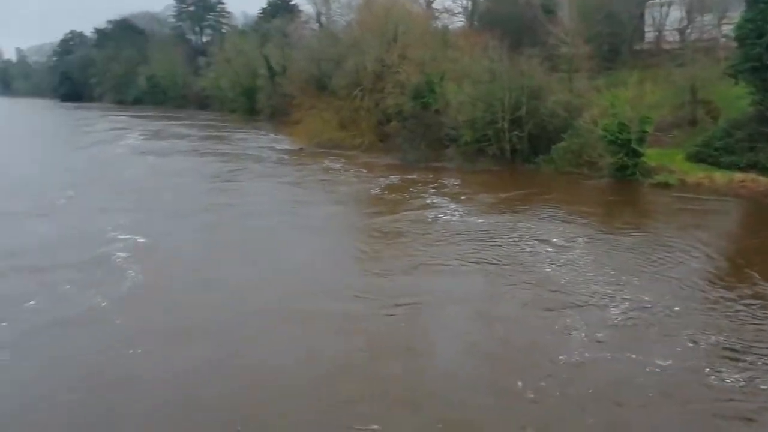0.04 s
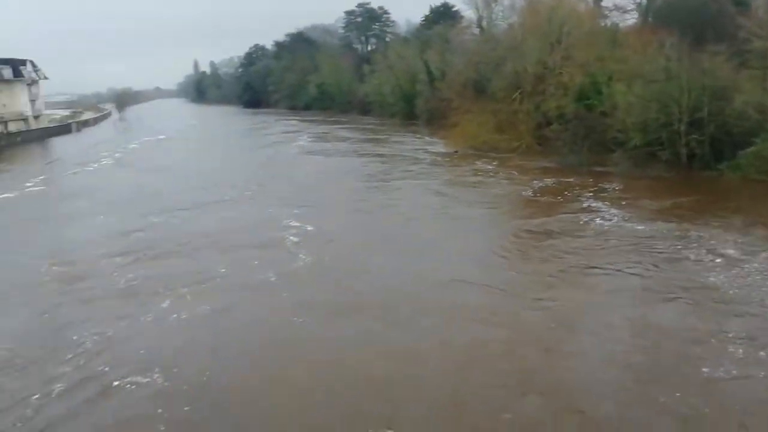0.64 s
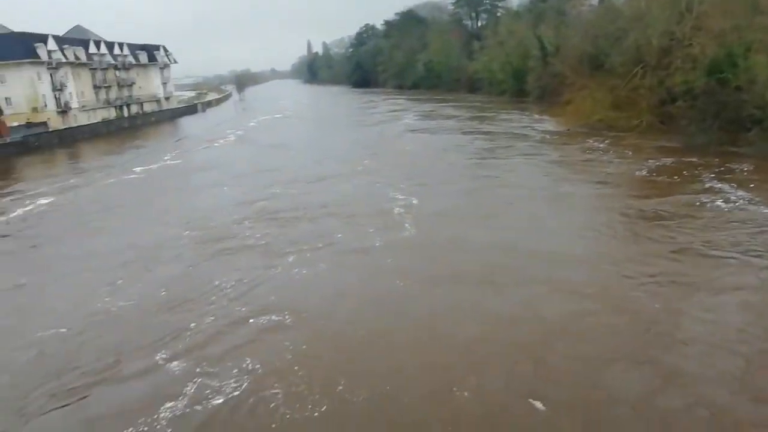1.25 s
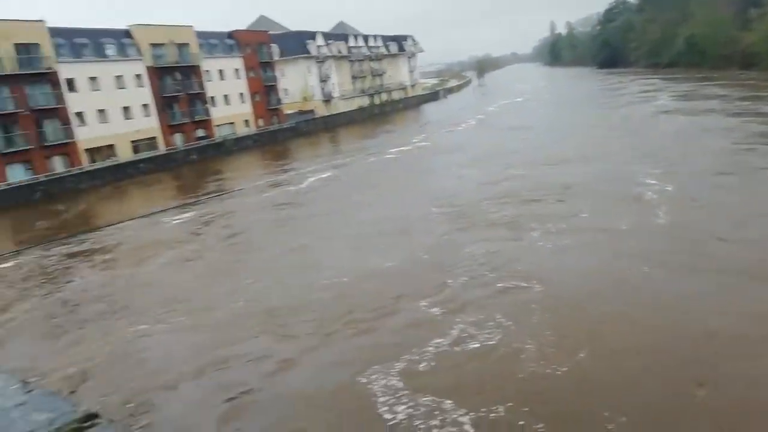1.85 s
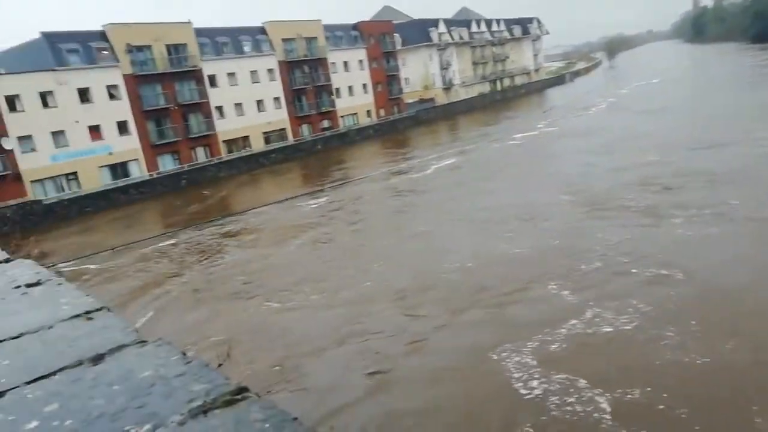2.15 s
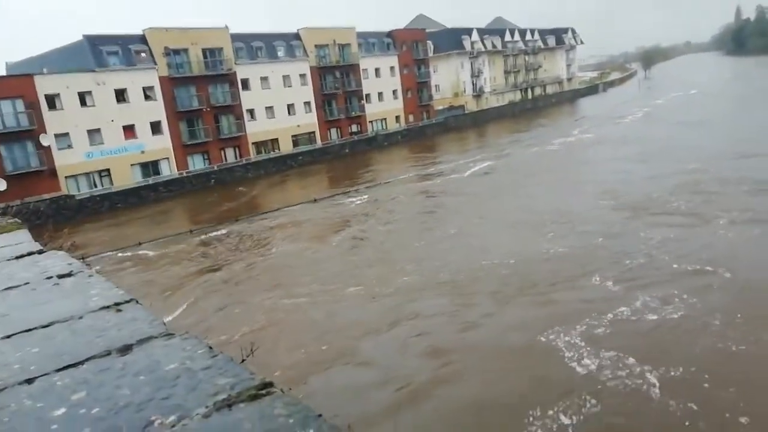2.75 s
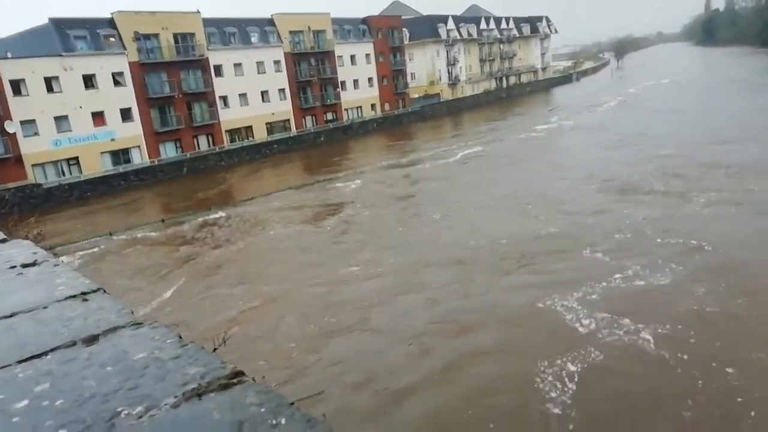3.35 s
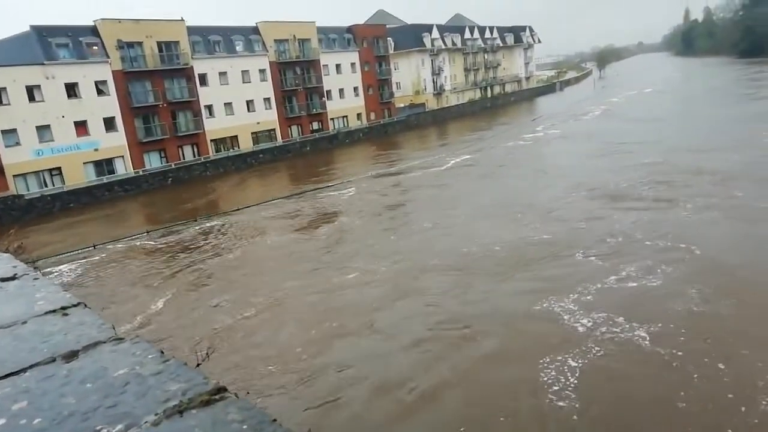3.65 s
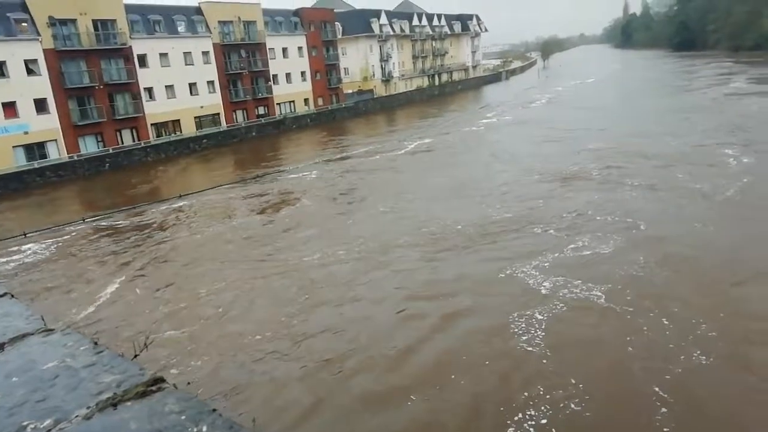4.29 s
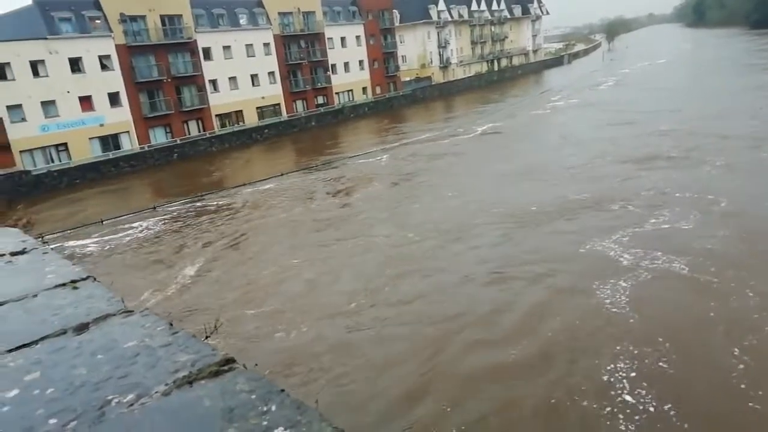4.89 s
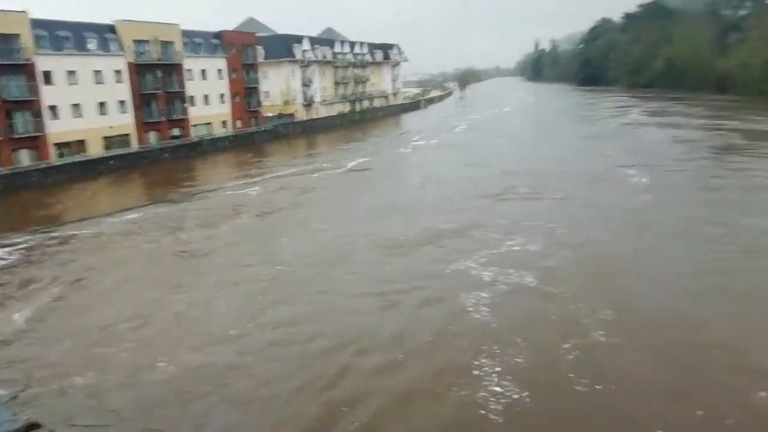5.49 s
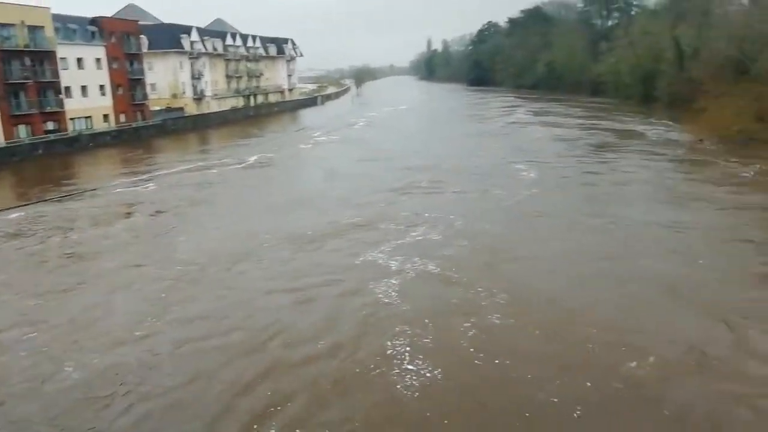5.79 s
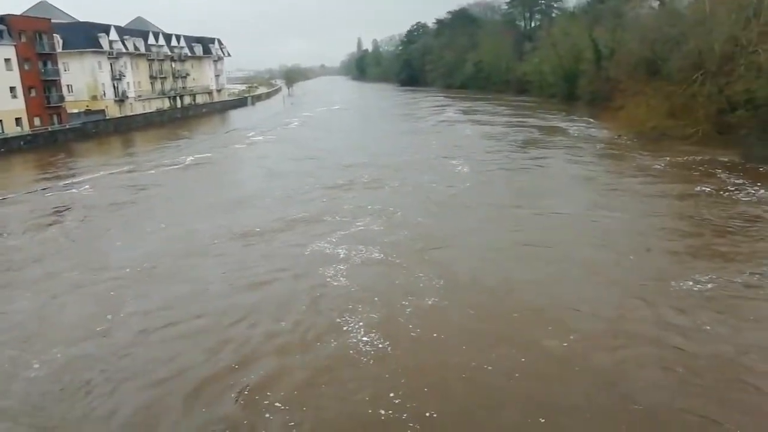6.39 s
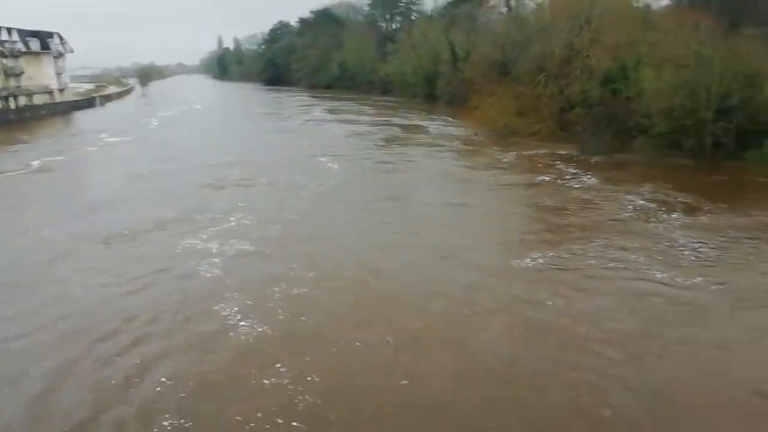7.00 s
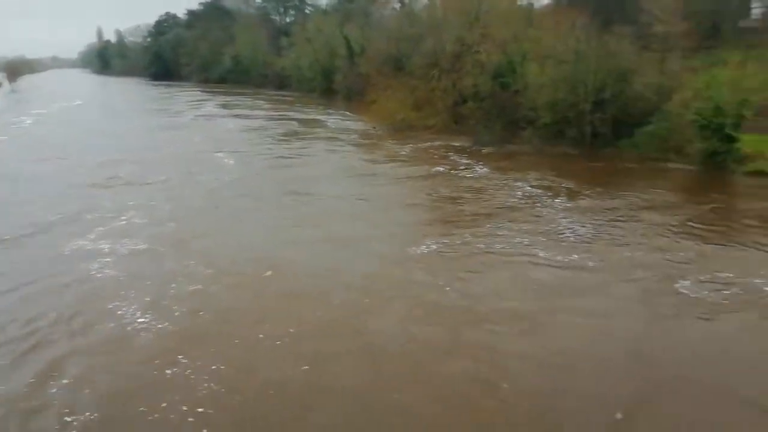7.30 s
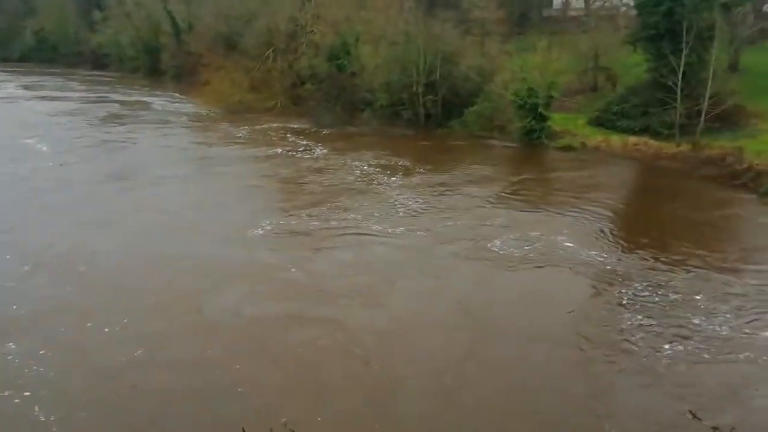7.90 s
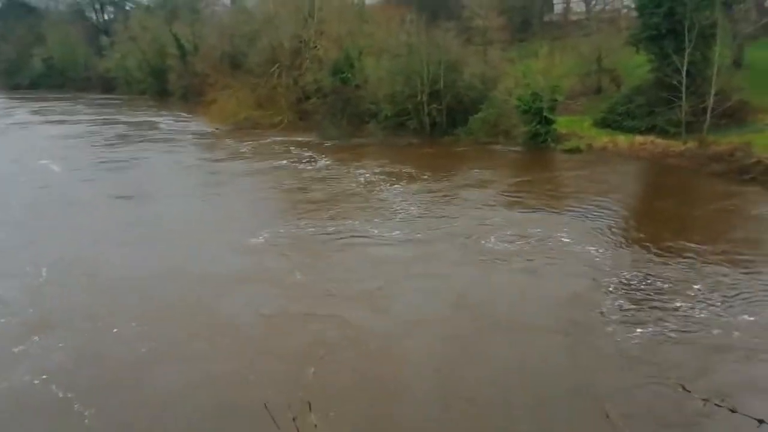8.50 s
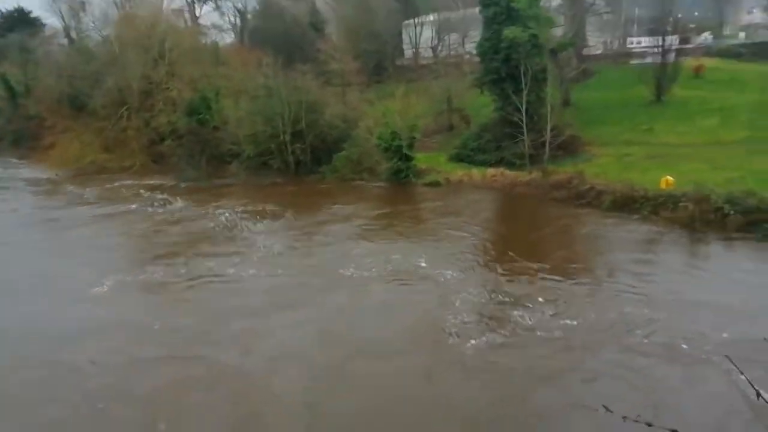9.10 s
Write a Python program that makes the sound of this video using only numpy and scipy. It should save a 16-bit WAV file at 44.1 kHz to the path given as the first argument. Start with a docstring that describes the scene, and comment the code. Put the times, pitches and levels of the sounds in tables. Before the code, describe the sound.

A flooded river rushes steadily as wind buffets the microphone and a car swishes past on a wet road, left to right.

```python
"""A river in flood rushes and churns under a town bridge, bubbles ringing in the water.
Gusts and hard eddies buffet the two ports of a hand-held microphone.
A car passes close behind on the wet roadway, left to right: the exhaust drones, the tyres roar,
air howls in the tread grooves, and in each puddle water swishes out of the treads with a fine
spray of droplets. A few larger drops are flung from the wheels."""
import sys
import numpy as np
from scipy import signal
from scipy.fft import rfft, irfft, next_fast_len
from scipy.io import wavfile
from scipy.ndimage import uniform_filter1d

SR = 44100
rng = np.random.default_rng(int(sys.argv[2]) if len(sys.argv) > 2 else 0)


def master_out(mix):
    """Clip the mix to full scale and print it as 16-bit PCM to the path in sys.argv[1]."""
    frames = np.transpose(np.atleast_2d(mix))
    ceiling = np.clip(frames, -1, 1)
    pcm = np.round(ceiling * 32767).astype(np.int16)
    wavfile.write(sys.argv[1], SR, pcm)


N = 407925
TIME = np.arange(N) / SR
BINS_HZ = np.fft.rfftfreq(next_fast_len(N), 1 / SR)
SIDES = np.array([[1], [-1]])   # left, right


def from_db(db):
    return 10 ** (np.asarray(db) / 20)


def unit_rms(x):
    return x / np.sqrt(np.mean(x ** 2) + 1e-20)


def pan(left_right_db):
    return from_db(SIDES * left_right_db / 2)


def in_time(rows):
    """Table columns, interpolated linearly in time."""
    times_s, *columns = np.transpose(rows)
    return [np.interp(TIME, times_s, column) for column in columns]


def swell(from_s, hold_s, rise_s, fall_s):
    """Exponential rise to 1 at from_s, hold, exponential fall."""
    outside = np.maximum(from_s - TIME, 0) / rise_s + np.maximum(TIME - from_s - hold_s, 0) / fall_s
    return np.exp(-np.minimum(outside, 20))


def drift(rate_hz):
    """Slow random wander, rms 1."""
    pole = np.exp(-80 * np.pi * rate_hz / SR)
    slow = signal.lfilter([1], [1, -2 * pole, pole * pole], rng.standard_normal(N // 40 + 2002))[2000:]
    return np.interp(np.arange(N) / 40, np.arange(len(slow)), unit_rms(slow))


def flutter(rate_hz):
    """Drift less its 0.1 s running mean, rms 1."""
    quick = drift(rate_hz)
    return unit_rms(quick - uniform_filter1d(quick, size=4400))


def grains(per_s, spread_db):
    """Random clicks of uneven size."""
    sizes = from_db(spread_db * np.minimum(rng.exponential(1, N), 4)) * rng.choice([-1, 1], N)
    return sizes * (rng.random(N) < per_s / SR)


def ring(clicks, hz, cycles):
    """Each click rings a sine that falls 60 dB in the given cycles."""
    radius, angle = from_db(-60 * hz / (cycles * SR)), 2 * np.pi * hz / SR
    return signal.lfilter([0, np.sin(angle)], [1, -2 * radius * np.cos(angle), radius ** 2], clicks + 1e-18)


def lowpass(x, order, edge_hz):
    return signal.sosfilt(signal.butter(order, edge_hz, fs=SR, output="sos"), x)


def split(x, edge_hz):
    """Zero-phase low and high bands."""
    low = signal.sosfiltfilt(signal.butter(3, edge_hz, fs=SR, output="sos"), x)
    return low, x - low


def noise_band(centre_hz, width_hz):
    """Narrow noise about a fixed or moving centre, rms 1."""
    slow = lowpass(rng.standard_normal((2, N)), 3, width_hz / 2)
    phase = 2 * np.pi * np.cumsum(centre_hz * np.ones(N)) / SR
    return unit_rms(slow[0] * np.cos(phase) + slow[1] * np.sin(phase))


def fft_filter(x, gain):
    return irfft(rfft(x, next_fast_len(N)) * gain, next_fast_len(N))[..., :N]


def colour(x, spectrum, power=1):
    """Filter by (frequency [Hz], gain [dB]) rows, raised to a power."""
    hz, db = np.transpose(spectrum)
    return fft_filter(x, from_db(power * np.interp(np.log(BINS_HZ + 1), np.log(hz), db)))


def phase_lead(table):
    """Opposite phase shifts for the ports from (frequency [Hz], ..., left lead [rad]) rows."""
    hz, *_, lead_rad = np.transpose(table)
    return np.exp(.5j * SIDES * np.interp(BINS_HZ, hz, lead_rad))


def lagged(x, lead_ms):
    """One wave at both ports, the left earlier by lead_ms."""
    fine, fine_s = signal.resample_poly(x, 2, 1), np.arange(2 * N) / (2 * SR)
    return np.array([np.interp(TIME + side * lead_ms / 2000, fine_s, fine) for side in (1, -1)])


# Rush of the water: (time [s], level [dB])
RIVER_LEVEL = [(0.0, -35), (0.8, -36), (1.5, -35), (2.3, -37), (4.5, -35.5), (7.3, -35.5), (8.1, -37),
               (8.7, -37), (9.25, -37)]
# Its spectrum: (frequency [Hz], gain [dB])
RIVER_SPECTRUM = [(40, 5.5), (60, 3.5), (200, -6), (450, -11), (850, -9.5), (1250, -12.5), (1800, -14),
                  (2450, -15.5), (3100, -16.5), (4000, -17.5), (5200, -17.5), (6800, -23.5), (8200, -25.5),
                  (10500, -40.5), (15500, -54)]
# Its spread over the ports: (frequency [Hz], coherence [0-1], left lead [rad])
RIVER_SPREAD = [(100, 0.99, 0.5), (244, 0.89, -1), (444, 0.82, 2.5), (610, 0.74, 3), (1010, 0.65, 3.5),
                (1300, 1, 4.5), (1470, 0.28, 5), (1900, 0.34, 6), (2500, 0.6, 4.5), (3260, 0.54, 7),
                (4080, 0.38, 9), (5270, 0.12, 13.5), (6370, 0.24, 15), (8300, 0.23, 12.5),
                (11000, 0.3, 17.5)]
# Its treble balance as the microphone turns: (time [s], left-right [dB])
RIVER_TREBLE_PAN = [(0.0, 0.5), (1.5, 1.5), (7.5, -1.5), (9.25, 1)]


def river(bubble_db=-9, surge_db=0.4):
    """A broad rush with nearer bubbles ringing in it; so wide a source is only partly coherent."""
    bursts, size_class = grains(per_s=1800, spread_db=8.5), rng.integers(0, 20, N)
    bubbles = sum(ring(bursts * (size_class == k), hz, cycles=15) * hz
                  for k, hz in enumerate(np.geomspace(600, 8000, 20)))
    rush = rng.standard_normal((3, N))
    rush[0] += from_db(bubble_db) * unit_rms(bubbles)
    water = unit_rms(colour(rush, [(5, -16)] + list(RIVER_SPECTRUM)))
    water *= from_db(in_time(RIVER_LEVEL)[0] + surge_db * flutter(6))
    hz, coherence, _ = np.transpose(RIVER_SPREAD)
    alike = np.clip(np.interp(BINS_HZ, hz, coherence), 0, 1)
    shared = fft_filter(water[0], np.sqrt(alike) * phase_lead(RIVER_SPREAD))
    diffuse = fft_filter(water[1:], np.sqrt(1 - alike))
    low, treble = split(shared + diffuse, edge_hz=2100)
    return low + treble * pan(in_time(RIVER_TREBLE_PAN)[0])


# Churning water: (time [s], centre [Hz], level [dB])
CHURN_BAND = [(0.0, 1916, -57), (1.3, 1542, -50), (2.3, 1737, -57.5), (7.0, 1850, -57.5), (8.1, 1778, -50),
              (9.25, 1795, -65)]


def churn(width_hz=420, flutter_db=1.5):
    """A hollow band in the rush that swells and wanders in pitch."""
    centre_hz, db = in_time(CHURN_BAND)
    return noise_band(centre_hz, width_hz) * from_db(db + flutter_db * flutter(15))


# Gusts at the microphone: (time [s], hold [s], relative level [dB], extra rumble [dB])
WIND_GUSTS = [(0.108, 0.019, -16, -2), (0.199, 0.046, -17.5, -10), (0.404, 0.085, -26, 5),
              (0.543, 0.078, -18, -2), (0.767, 0.082, -27.5, 12), (0.88, 0.086, -26.5, 7.5),
              (1.057, 0.045, -18, 1.5), (1.161, 0.084, -24, 12), (1.296, 0.028, -21.5, 2),
              (1.379, 0.038, -19, 8.5), (1.481, 0.039, -21.5, 2), (1.679, 0.072, -20.5, 1.5),
              (1.871, 0.34, -19.5, 0.5), (2.305, 0.064, -23, -1), (2.45, 0.041, -25.5, 3.5),
              (3.207, 0.2, -21.5, -5), (3.473, 0.086, -21.5, -1.5), (3.622, 0.062, -24, -1),
              (4.826, 0.033, -23, -9), (5.06, 0.12, -28, 1), (5.231, 0.23, -22, -21),
              (5.495, 0.16, -26.5, -4), (6.139, 0.066, -31.5, 10), (6.252, 0.056, -20, -4),
              (6.39, 0.084, -29.5, 4.5), (6.595, 0.09, -23.5, 8), (6.71, 0.065, -19.5, -4),
              (6.809, 0.16, -21.5, 3), (7.32, 0.16, -24.5, 3), (7.709, 0.012, -27, -5),
              (8.192, 0.033, -33.5, 6.5), (8.636, 0.02, -24, 6.5), (8.717, 0.0098, -30, -11),
              (8.987, 0.027, -34, 6.5), (9.206, 0.017, -32.5, -9)]


def gusts(breeze_db=-49.5, swing_db=0.5, attack_s=0.02, release_s=0.024):
    """Wind strength and extra rumble: the strongest gust of the moment overrides the breeze."""
    strength, rumble_db = from_db(breeze_db + swing_db * drift(3)), np.zeros(N)
    for at_s, hold_s, db, deep_db in WIND_GUSTS:
        gust = from_db(db) * swell(at_s, hold_s, attack_s, release_s)
        rumble_db[gust > strength] = deep_db
        strength = np.maximum(strength, gust)
    return strength, uniform_filter1d(rumble_db, size=900)


# Turbulent pressure: (frequency [Hz], gain [dB])
WIND_SPECTRUM = [(15, 1.5), (30, -6.5), (90, -1), (150, -4), (220, -8.5), (320, -14.5), (450, -23.5),
                 (700, -36.5), (1500, -72)]


def wind(level_db=-1, lump_db=4.5, fine_lump_db=3.0, small_db=-6, crossing_ms=-0.84, veer_ms=0.12):
    """Turbulence crosses the ports in lumps; stronger gusts shed smaller eddies and sound brighter."""
    strength, rumble_db = gusts()
    turbulence = colour(rng.standard_normal((3, N)), WIND_SPECTRUM)
    # large eddies cover both ports, small ones only one
    large = lagged(turbulence[0], crossing_ms + veer_ms * drift(9.3))
    small = split(turbulence[1:], edge_hz=114)[1]
    slow, fine = split(unit_rms(large + from_db(small_db) * small), edge_hz=314)
    brightness = unit_rms(from_db(fine_lump_db * drift(43))) * (strength / from_db(-29)) ** 0.2
    lumps = (slow + fine * brightness) * from_db(lump_db * drift(17.3))
    # levelled, so that the gust sets the mean strength
    lumps /= np.sqrt(uniform_filter1d(np.mean(lumps ** 2, axis=0), size=3000) + 1e-9)
    rumble = (from_db(rumble_db) - 1) * lowpass(lumps, 1, edge_hz=60)
    return from_db(level_db) * pan(-0.3) * strength * (lumps + rumble)


# Hard eddies: (time [s], relative level [dB], pitch [Hz], decay [cycles])
EDDY_THUMPS = [(0.419, -13.5, 260, 2.7), (0.463, -16, 245, 7.1), (1.915, -4.5, 191, 1),
               (3.3126, -1.5, 420, 2.2), (3.344, -6.5, 131.1, 1.3), (4.842, -9, 178, 4.3),
               (5.233, -16, 125, 6.2), (5.351, -10, 174, 4.1), (6.745, -9.5, 153, 8.7),
               (8.721, -15.5, 131, 3.9)]


def eddies(gain_db=5, crossing_ms=-0.76, pan_db=-5.0):
    """Each hard eddy sucks at the ports: one heavily damped thump."""
    thumps = 0
    for at_s, db, hz, cycles in EDDY_THUMPS:
        suction = -from_db(db + gain_db) * (np.arange(N) == round(at_s * SR))
        thumps = thumps + ring(suction, hz, cycles)
    return lagged(lowpass(thumps, 4, edge_hz=860), crossing_ms) * pan(pan_db)


ABREAST_S, DISTANCE_M = 4.8, 4.9
CAR_M_PER_S, SOUND_M_PER_S = 15.0, 343


def car_path():
    """Straight pass: bearing (-1 approaching, 0 abreast, 1 gone) and nearness (1 abreast)."""
    along_m = CAR_M_PER_S * (TIME - ABREAST_S)
    range_m = np.hypot(along_m, DISTANCE_M)
    return along_m / range_m, DISTANCE_M / range_m


# Exhaust note: (order [x firing rate], relative level [dB])
EXHAUST_ORDERS = [(1, 4), (2, 8.5), (3, -11.5), (4, 1)]


def engine(firing_hz=57.7, drone_db=-35.5, boom_db=-35.5, wobble=0.0185, throb_db=3.0):
    """Unsteady exhaust drone with Doppler shift, louder when near, and one short boom as it passes."""
    bearing, nearness = car_path()
    heard_hz = firing_hz / (1 + bearing * CAR_M_PER_S / SOUND_M_PER_S)
    phase = 2 * np.pi * np.cumsum(heard_hz * (1 + wobble * drift(11.0))) / SR
    throbbing = sum(from_db(db + throb_db * drift(3.9)) * np.sin(k * phase) for k, db in EXHAUST_ORDERS)
    steady = sum(from_db(db) * np.sin(k * phase) for k, db in EXHAUST_ORDERS)
    drone = unit_rms(throbbing) * from_db(drone_db) * nearness ** 0.85
    boom = unit_rms(steady) * from_db(boom_db) * swell(from_s=5.2, hold_s=.07, rise_s=.05, fall_s=.05)
    return drone + boom


# Standing water: (time [s], rise [s], hold [s], fall [s], swish [dB], spray [dB], reflection [0-1])
ROAD_PUDDLES = [(1.3, 0.19, 0.65, .4, -62, -51, 0), (2.32, 0.2, 0.17, 0.6, -64, -38, 0.3),
                (2.79, 0.21, 0.42, 0.14, -46, -42, 0.16), (3.87, 0.39, 0.3, 0.75, -33.5, -39, 0.06),
                (5.142, 0.091, 0.54, 0.44, -57, -46.5, 0), (5.67, 0.21, 0.75, 0.12, -34.5, -41.5, 0),
                (6.6, 0.19, 0.29, 0.3, -43.5, -47.5, 0.25)]


def puddles(rolling, damp_swish_db=-11, damp_spray_db=-12):
    """Swish, spray and reflection envelopes: each puddle adds to the hiss of the damp road."""
    swish_power = (rolling * from_db(damp_swish_db)) ** 2
    spray_power = (rolling * from_db(damp_spray_db)) ** 2
    reflection = 0
    for at_s, rise_s, hold_s, fall_s, swish_db, spray_db, mirror in ROAD_PUDDLES:
        depth = swell(at_s, hold_s, rise_s, fall_s)
        swish_power += (depth * from_db(swish_db)) ** 2
        spray_power += (depth * from_db(spray_db)) ** 2
        reflection = np.maximum(reflection, depth * mirror)
    return np.sqrt(swish_power), np.sqrt(spray_power), reflection


# Swish ahead of the car and behind it: (frequency [Hz], gain [dB])
SWISH_FRONT_SPECTRUM = [(500, 1.5), (1100, -13), (1900, -1), (3200, 0.5), (4500, -1.5), (7000, -18),
                        (10000, -40), (15500, -41)]
SWISH_REAR_SPECTRUM = [(500, -8.5), (1450, -11), (2050, -2), (2700, -3), (3300, 1.5), (3900, -2),
                       (4800, -4.5), (7000, -16), (10000, -32), (15500, -39)]


def swish(strength, flutter_db=1.54):
    """Water squirts from the treads; the colour changes as their rear comes into view."""
    squirts = np.array([grains(per_s=7000, spread_db=6.0) for wave in range(3)])
    front = unit_rms(colour(squirts, SWISH_FRONT_SPECTRUM))
    rear = unit_rms(colour(squirts, SWISH_REAR_SPECTRUM))
    bearing, _ = car_path()
    behind = np.clip(.5 + bearing, 0, 1)
    return ((1 - behind) * front + behind * rear) * strength * from_db(flutter_db * flutter(35))


# Fine spray: (frequency [Hz], gain [dB])
SPRAY_SPECTRUM = [(1000, -7.5), (2500, -19), (4000, 2), (5200, 5.5), (6800, 4.5), (8100, 3.5), (10500, -11),
                  (15500, -24.5)]


def spray(strength, droplet_db=-4, flutter_db=1.82):
    """The treads throw up a hissing mist of ticking droplets."""
    droplets = unit_rms(np.array([grains(per_s=2000, spread_db=8.0) for wave in range(3)]))
    mist = rng.standard_normal((3, N)) + from_db(droplet_db) * droplets
    return unit_rms(colour(mist, SPRAY_SPECTRUM)) * strength * from_db(flutter_db * flutter(42))


def road_echoes(waves, reflection, delays_ms=(1.185, 1.41), shrink_from_s=2.45, shrink_per_s=.06):
    """Echoes off the wet road and parapet comb the hiss; the peaks rise as the delays shorten."""
    shrink = 1 - shrink_per_s * np.maximum(TIME - shrink_from_s, 0)
    echoes = sum(np.array([np.interp(TIME - ms * shrink / 1000, TIME, wave) for wave in waves])
                 for ms in delays_ms)
    return (waves + reflection * echoes) / np.sqrt(1 + 2 * reflection ** 2)


# Tyre roar: (frequency [Hz], gain [dB])
ROAR_SPECTRUM = [(40, -21), (60, -10), (220, -0.5), (530, -16), (800, -6.5), (1100, -5), (1600, -7.5),
                 (2500, -15), (5000, -36), (15500, -68)]


def tyres(roar_db=-34):
    """Treads roar on the road and shed water; three independent waves."""
    rolling = from_db(roar_db) * swell(from_s=3.38, hold_s=1.2, rise_s=1, fall_s=2.17)
    swishing, spraying, reflection = puddles(rolling)
    roar = unit_rms(colour(rng.standard_normal((3, N)), [(12, -23)] + list(ROAR_SPECTRUM))) * rolling
    return roar + road_echoes(swish(swishing) + spray(spraying), reflection)


# Car direction at the turning microphone: (time [s], left lead [ms], treble left-right [dB])
CAR_DIRECTION = [(1.8, 0.37, 2), (2.3, 0.28, 6), (2.8, 0.31, 4), (3.3, 0.35, 3.5), (3.9, 0.43, 4),
                 (4.2, 0.39, 7), (4.5, 0.37, 4.5), (4.85, -0.084, 0), (5.05, -0.134, -3),
                 (5.45, -0.27, -5.5), (5.95, -0.33, -3), (7.2, -0.45, -4)]
# Shading by the housing once the car is past: (frequency [Hz], left-right [dB])
HOUSING_SHADE = [(300, 3.5), (900, -9.5), (1450, 5), (2000, -9), (2600, 13.5), (3250, 2.5), (4000, 10.5),
                 (4900, 10.5), (7000, -2.5), (10000, -0.5)]


def pass_by(waves, direct_ahead=0.8, direct_abreast=0.29, direct_gone=0.89):
    """One wave arrives directly, two scattered: the car is a point from afar, wide when abreast."""
    def at_ports(band, lead_ms, scatter):
        return np.sqrt(1 - scatter) * lagged(band[0], lead_ms) + np.sqrt(scatter) * band[1:]

    bearing, nearness = car_path()
    lead_ms, pan_db = in_time(CAR_DIRECTION)
    direct_far = np.where(bearing < 0, direct_ahead, direct_gone)
    direct = direct_far + (direct_abreast - direct_far) * nearness ** 4
    low, rest = split(waves, edge_hz=580)
    middle, top = split(rest, edge_hz=8800)
    # long waves lag more and scatter less
    bass = at_ports(low, lead_ms * 1.54, scatter=(1 - direct) * 0.28)
    treble = at_ports(middle, lead_ms, scatter=1 - direct) + at_ports(top, lead_ms, scatter=0.56)
    heard = bass * pan(pan_db * 0.194) + treble * pan(pan_db)
    gone = np.maximum(bearing, 0) ** 2
    return (1 - gone) * heard + gone * colour(heard, HOUSING_SHADE, power=SIDES / 2)


# Large drops off the wheels: (time [s], relative spit level [dB], relative fizz level [dB])
FLUNG_DROPS = [(3.557, -28.5, -54), (3.828, -30, -54), (5.435, -32, -46), (6.143, -23.5, -34),
               (6.2053, -27.5, -54)]


def drops(gain_db=-3, pan_db=-8, splash_s=.0025):
    """Each drop bursts in a bright spit of a few milliseconds, some with a fine fizz on top."""
    spit_spectrum = [(1500, -16), (5500, -12), (8000, 0), (10000, -19), (15500, -36)]
    fizz_spectrum = [(7000, -30), (11000, 0), (15500, -4), (18000, -30)]
    spit = unit_rms(colour(rng.standard_normal((2, N)), spit_spectrum))
    fizz = unit_rms(colour(rng.standard_normal((2, N)), fizz_spectrum))
    bursts = 0
    for at_s, spit_db, fizz_db in FLUNG_DROPS:
        decay = (TIME >= at_s) * swell(at_s, 0, splash_s, splash_s)
        bursts = bursts + (from_db(spit_db) * spit + from_db(fizz_db) * fizz) * decay
    return bursts * from_db(gain_db) * pan(pan_db)


# Air ringing in the treads: (time [s], hold [s], level [dB], pitch [Hz], left-right [dB])
GROOVE_HOWLS = [(4.64, 0.077, -38, 1310, -4), (4.64, 0.38, -40.5, 903, 9), (5.027, 0.25, -42.5, 1105, 6)]


def grooves(width_hz=450, diffuse_db=-7, rise_s=0.017, fall_s=0.12):
    """Grooves pressed on the road are short pipes that howl sideways as the wheels come abreast."""
    howls = 0
    for at_s, hold_s, db, pipe_hz, pan_db in GROOVE_HOWLS:
        shared, *diffuse = [noise_band(pipe_hz, width_hz) for wave in range(3)]
        howl = unit_rms(shared + from_db(diffuse_db) * np.array(diffuse))
        howls = howls + howl * from_db(db) * pan(pan_db) * swell(at_s, hold_s, rise_s, fall_s)
    return howls


# Phase of the car's sound between the ports: (frequency [Hz], left lead [rad])
CAR_PORT_PHASE = [(800, -0.041), (1400, 0.77), (2400, 0.74), (3700, 0.1), (4900, -0.56), (6200, -0.86),
                  (7200, -0.91), (8100, -0.34), (9500, 1.8)]
# Port cavities, left favouring presence, right ringing near 8 kHz: (frequency [Hz], left-right [dB])
PORT_COLOUR = [(200, -0.5), (550, 0.5), (1000, 1.5), (1300, -0.5), (1800, 6.5), (3200, 2), (5500, 4),
               (6500, 0.5), (7300, -8), (8300, -17.5), (10000, -8.5), (12000, -2.5), (15500, -1)]


def scene():
    """Airborne sound takes the colour of each port; wind acts on the ports directly."""
    car = pass_by(tyres()) + grooves() + engine() + drops()
    airborne = river() + churn() + fft_filter(car, phase_lead(CAR_PORT_PHASE))
    return colour(airborne, PORT_COLOUR, power=SIDES / 2) + wind() + eddies()


def record(dry, low_hz=20, top_hz=15750):
    """Subsonic cut and steep top cut."""
    thinned = signal.sosfilt(signal.butter(2, low_hz, "high", fs=SR, output="sos"), dry)
    return signal.sosfilt(signal.ellip(10, .1, 80, top_hz, fs=SR, output="sos"), thinned)


dry = scene()
out = record(dry)
master_out(out)
```